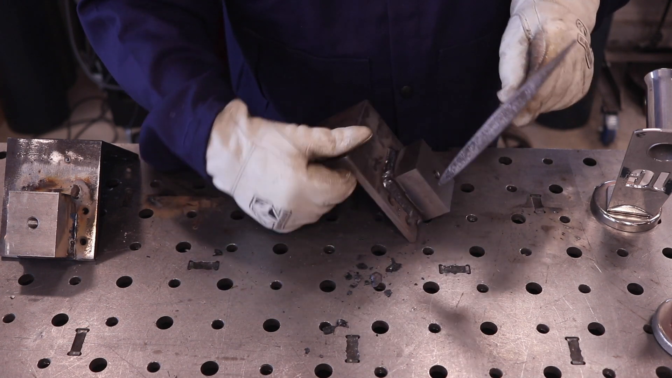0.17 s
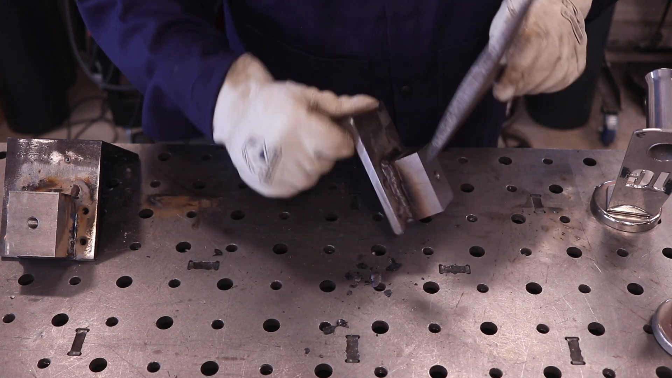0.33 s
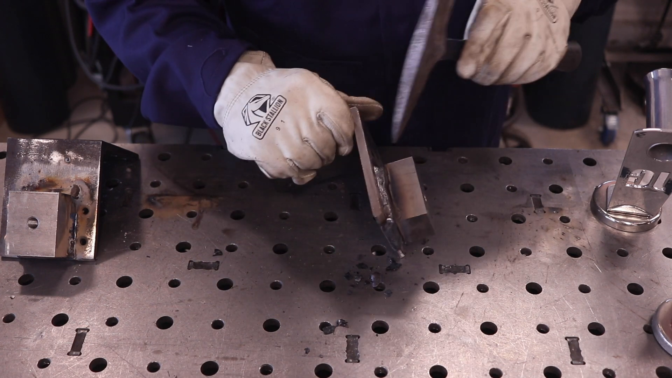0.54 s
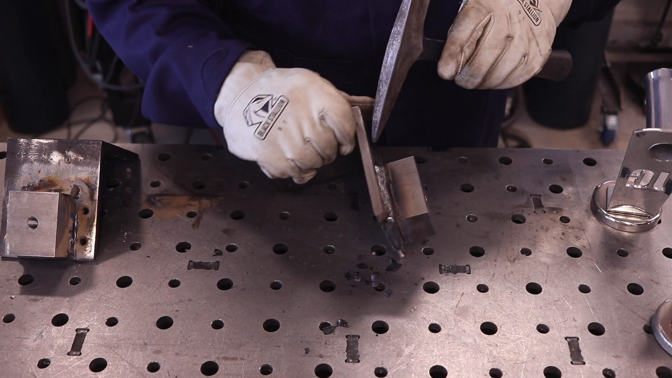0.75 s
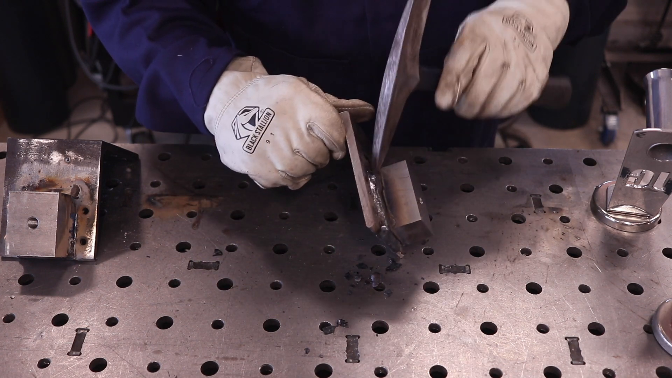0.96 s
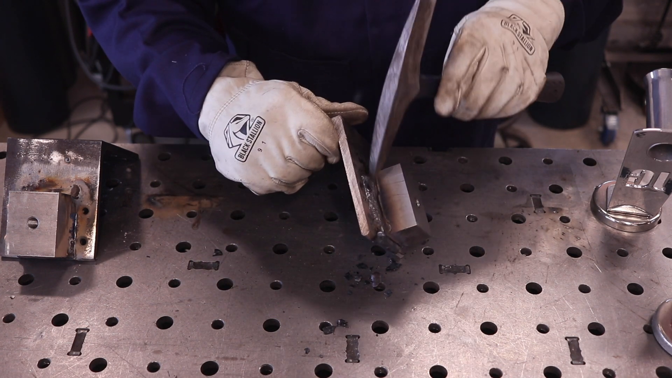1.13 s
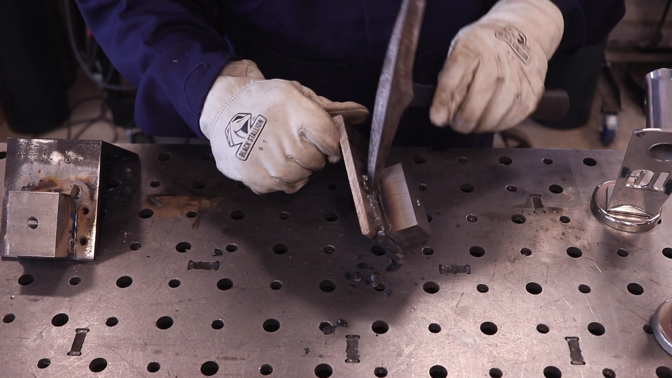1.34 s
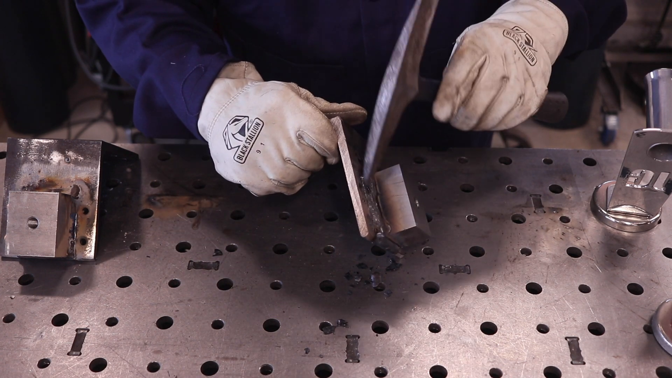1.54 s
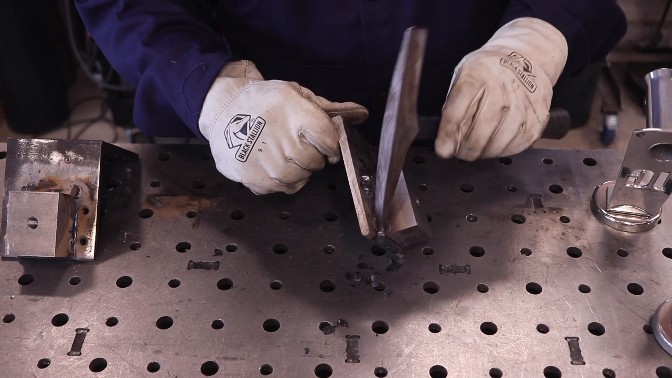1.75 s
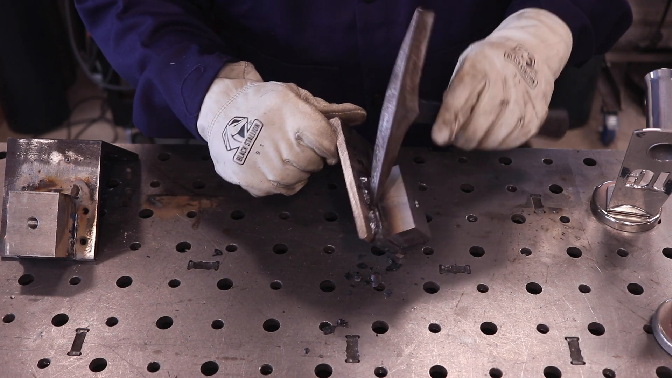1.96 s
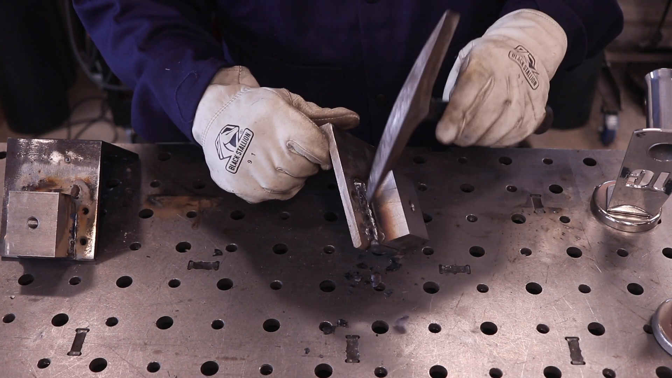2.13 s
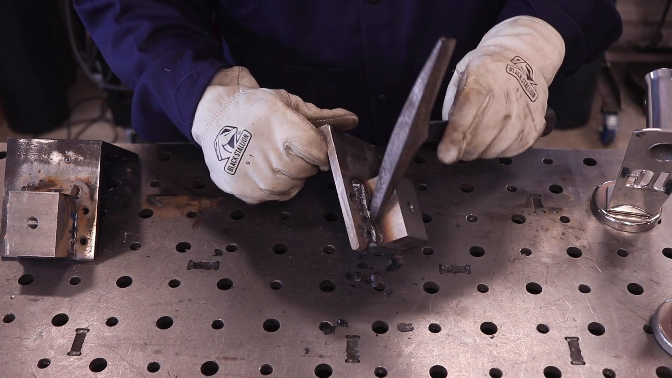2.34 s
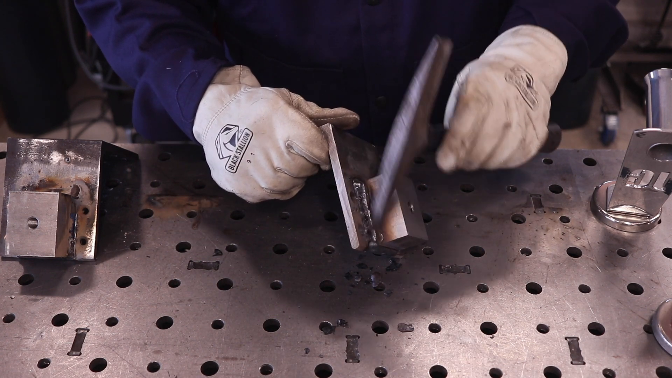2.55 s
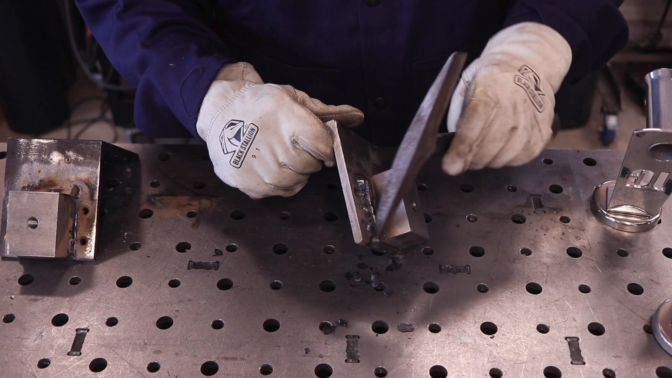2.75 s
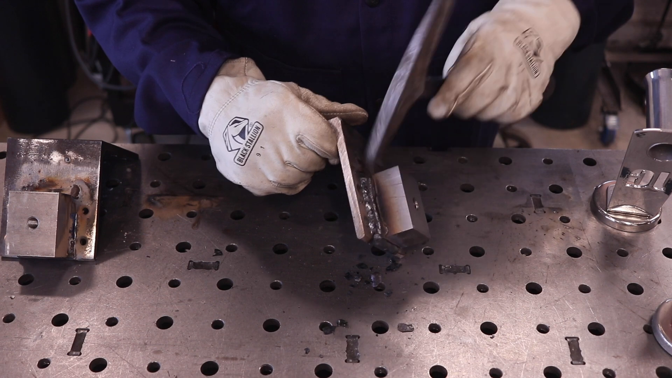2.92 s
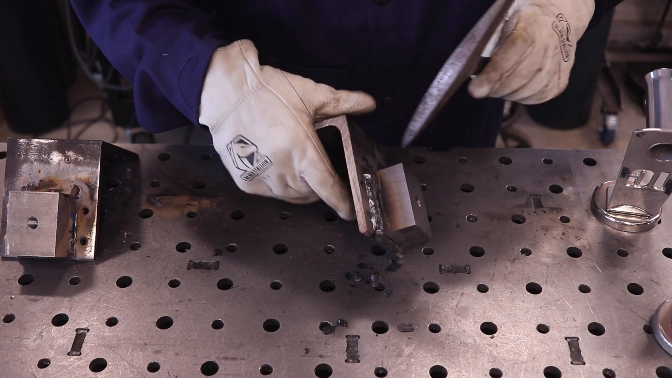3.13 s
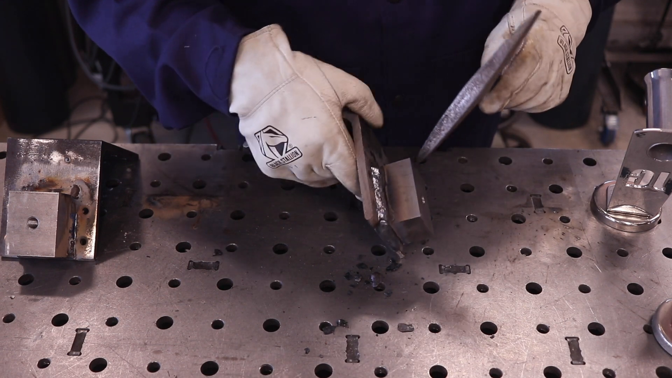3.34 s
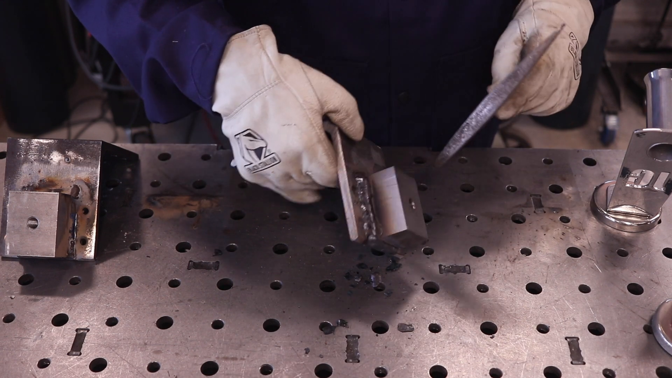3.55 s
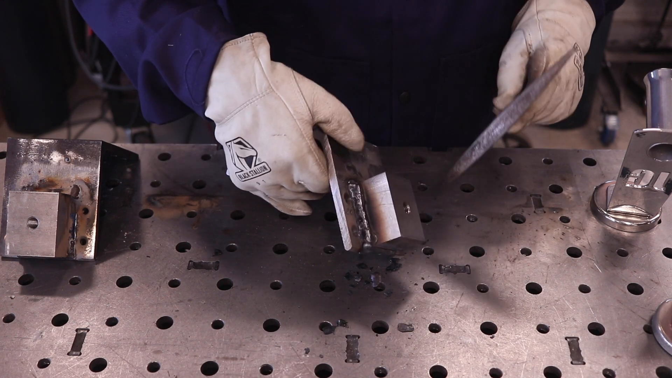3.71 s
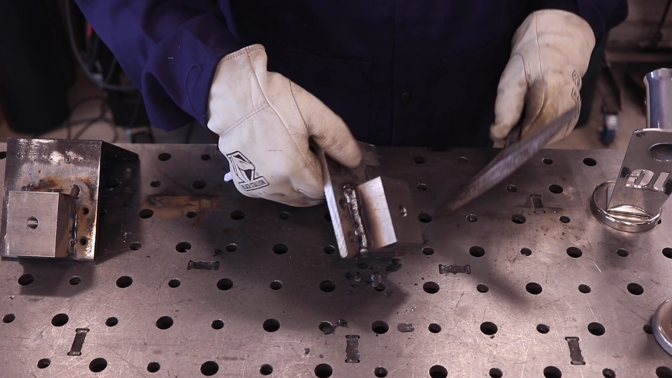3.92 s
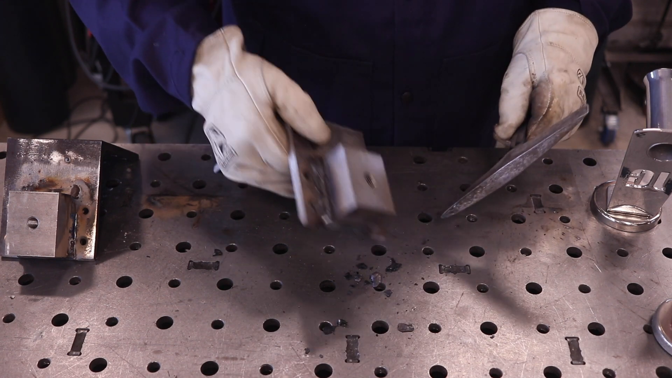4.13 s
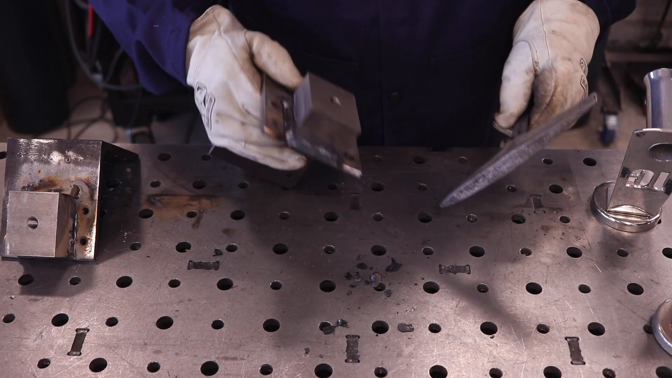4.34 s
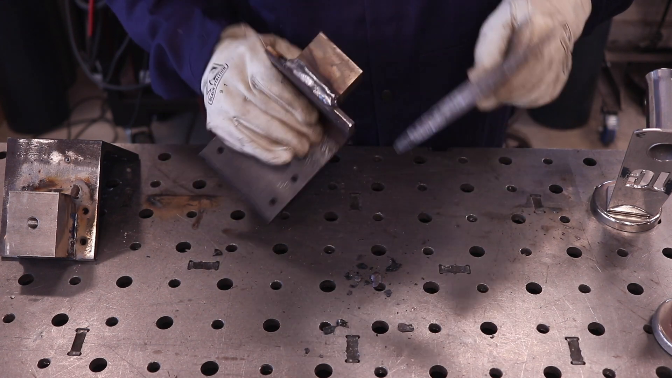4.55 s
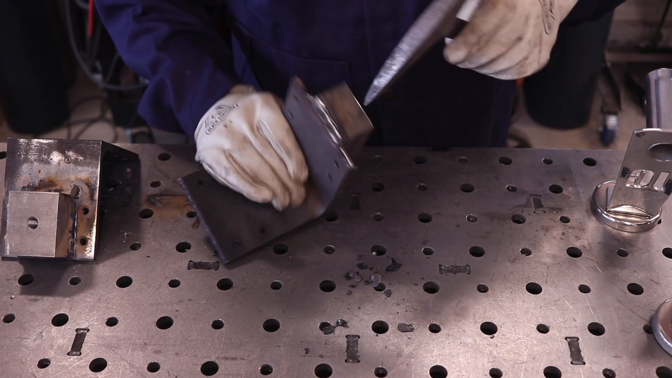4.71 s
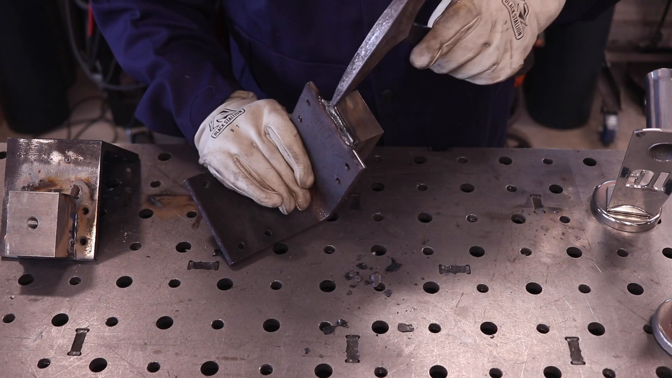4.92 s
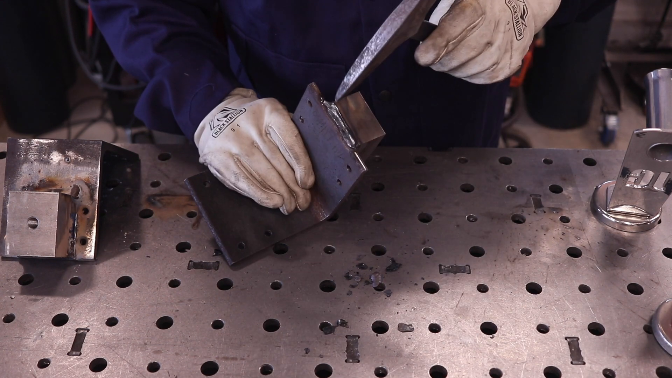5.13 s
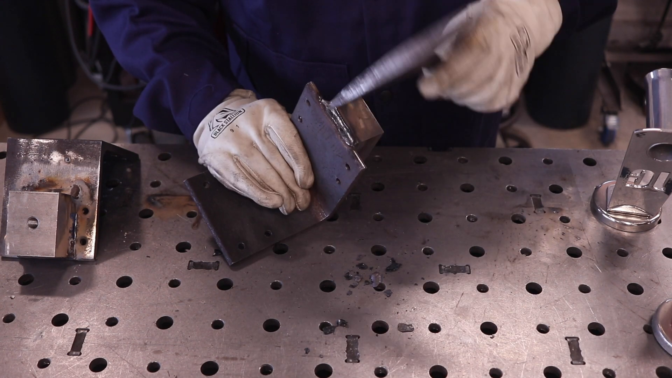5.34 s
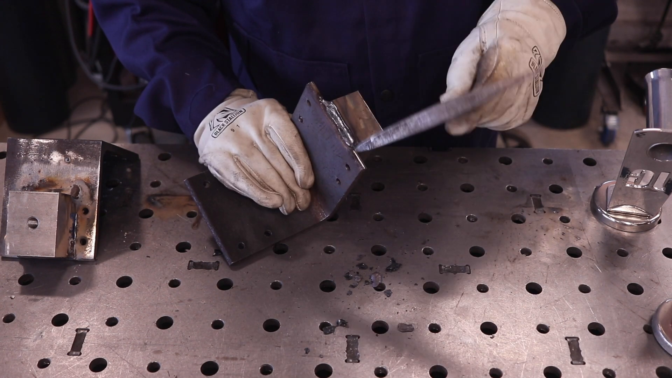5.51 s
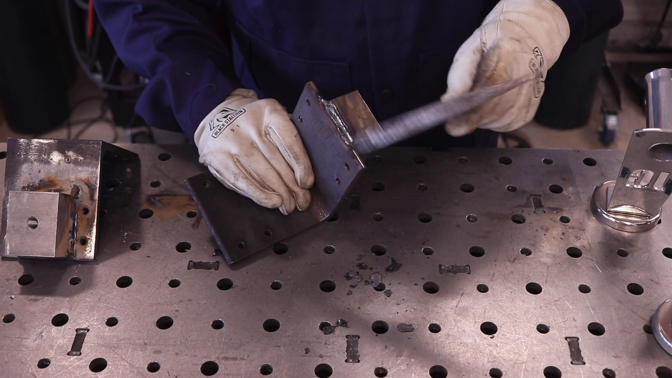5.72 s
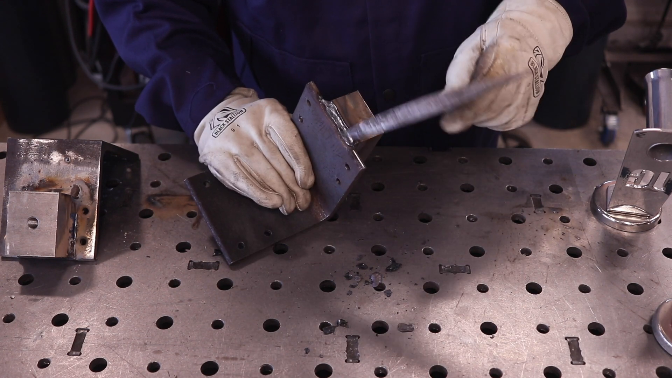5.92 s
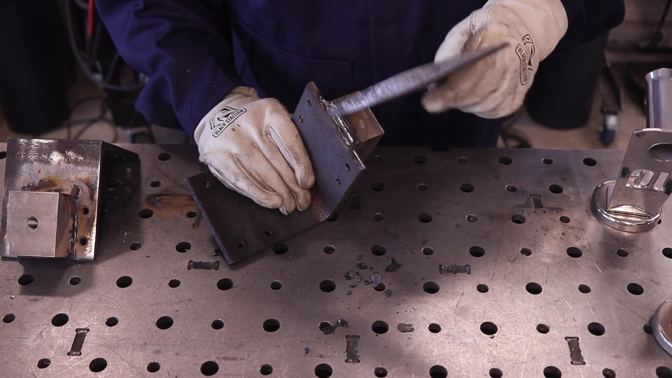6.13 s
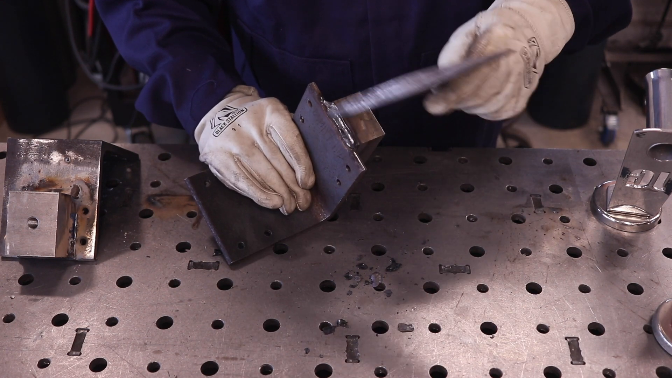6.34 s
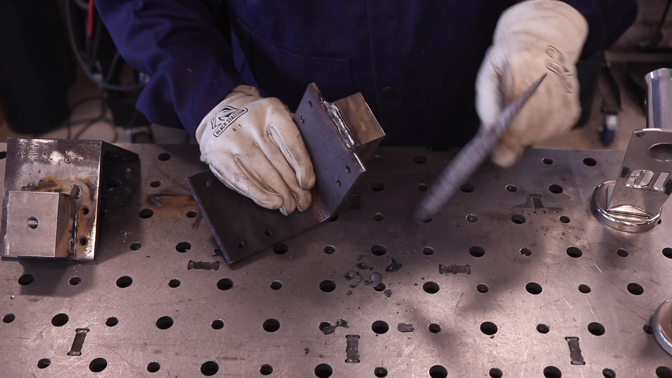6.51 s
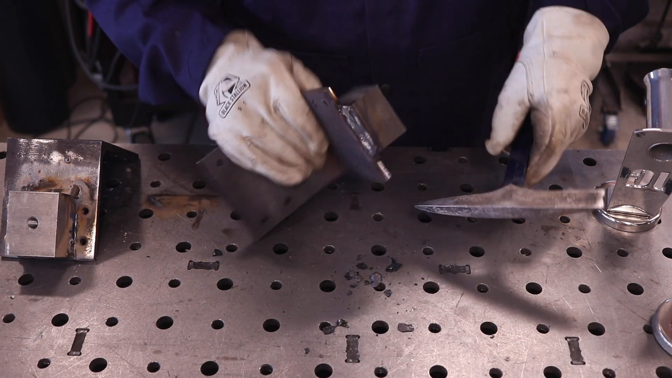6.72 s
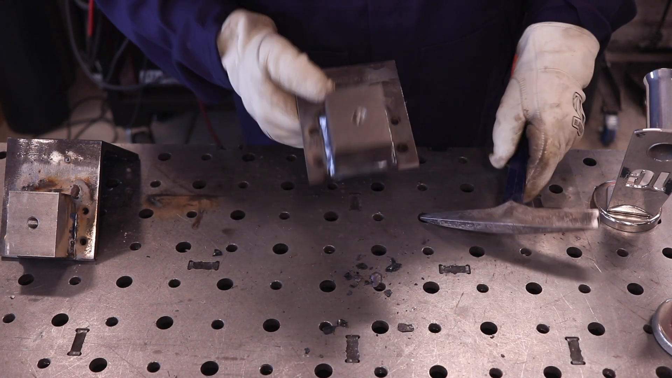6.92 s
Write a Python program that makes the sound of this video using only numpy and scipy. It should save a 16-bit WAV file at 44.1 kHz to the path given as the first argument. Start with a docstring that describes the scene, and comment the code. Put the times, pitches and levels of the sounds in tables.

```python
"""Chipping slag off a welded bracket

A gloved hand chips slag off a welded steel bracket on a thick steel bench in a workshop. Blows and landings are
impulses into damped resonators and decaying noise bands; scrapes and slides feed them with stick-slip grit.
Between blows the hammer head sings as decaying sines. Slag crumbs tick, cloth rustles as shaped hiss, the legs of
the bench boom; a diffuse reverberation and a filtered-noise shop hum lie around it all."""
import sys
import numpy as np
from scipy import signal
from scipy.fft import rfft, irfft, next_fast_len
from scipy.io import wavfile
from scipy.ndimage import uniform_filter1d

SR = 44100
rng = np.random.default_rng(int(sys.argv[2]) if len(sys.argv) > 2 else 0)


def dump(signal):
    """Clip the signal to [-1, 1] and save it as 16-bit WAV at the path in sys.argv[1]."""
    limited = np.clip(np.atleast_2d(signal).T, -1, 1)
    pcm = np.round(limited * 32767).astype(np.int16)
    wavfile.write(sys.argv[1], SR, pcm)


N = 307377
TIME = np.arange(N) / SR


def undb(db):
    """Decibels to gain."""
    return 10 ** (np.asarray(db) / 20)


def band(x, lo_hz, hi_hz):
    """Band-pass."""
    return signal.sosfilt(signal.butter(2, [lo_hz, min(hi_hz, .45 * SR)], "bandpass", fs=SR, output="sos"), x)


def hiss(lo_hz, hi_hz):
    """Band noise of rms 1."""
    x = band(rng.standard_normal(N), lo_hz, hi_hz)
    return x / x.std()


def fade(x, t60):
    """Every impulse becomes an exponential decay, 60 dB down after t60 seconds."""
    return signal.lfilter([1], [1, -1000 ** (-1 / (t60 * SR))], x)


def mode(x, hz, t60):
    """A damped resonator: an impulse of 1 rings with amplitude 1."""
    r = 1000 ** (-1 / (t60 * SR))
    w = 2 * np.pi * hz / SR
    return signal.lfilter([0, np.sin(w)], [1, -2 * r * np.cos(w), r * r], x)


def train(times, sizes):
    """Impulses at the given times."""
    x = np.zeros(N)
    np.add.at(x, (np.asarray(times) * SR).astype(int), sizes)
    return x


def walk(rate):
    """A wandering level: about rate random values per second, joined by ramps."""
    k = int(SR / rate)
    held = np.repeat(rng.standard_normal(N // k + 1), k)
    return uniform_filter1d(held, k)[:N]


def grit(rate, spread_db):
    """Stick-slip: irregular clicks, about rate per second, of very uneven size, rms 1."""
    clicks = rng.random(N) < rate / SR
    x = clicks * undb(spread_db * rng.exponential(size=N)) * rng.standard_normal(N)
    return x / x.std()


def span(start, end):
    """The samples between two times, and their times."""
    part = slice(int(start * SR), int(end * SR))
    return part, TIME[part]


def struck(modes, times, knock_db, rub, scatter_db):
    """Each knock lands elsewhere and wakes the modes unevenly; rubbing feeds them without pause."""
    chance = rng.standard_normal((len(times), len(modes), 2))
    out = 0
    for k, (hz, db, t60) in enumerate(modes):
        sign = np.sign(chance[:, k, 0])
        blows = train(times, sign * undb(knock_db(hz) + scatter_db * chance[:, k, 1]))
        # long-ringing modes are fed less, so that rubbing does not pile up in them
        out = out + undb(db) * mode(blows + rub / np.sqrt(t60 * SR), hz, t60)
    return out


def shop():
    """Distant ventilation and machinery: noise with a fixed spectrum, swelling a little."""
    # spectrum of the shop: f/Hz, relative level/dB per Hz
    spectrum = [(20, -22.5), (40, -15.5), (118, -2.5), (170, -7.5), (290, -5), (700, -11.5), (1500, -15.5),
                (3000, -22.5), (5000, -30), (9000, -40), (16500, -36.5)]
    overall_db, swells_per_s = -51.5, 3.9
    hz, db = np.transpose(spectrum)
    size = next_fast_len(N)
    f = np.maximum(np.arange(size // 2 + 1) * SR / size, 1)
    gain = undb(np.interp(np.log(f), np.log(hz), db))
    x = irfft(rfft(rng.standard_normal(size)) * gain, size)[:N]
    return x / x.std() * undb(overall_db + walk(swells_per_s))


def hammer(times, low_db, high_db, low_rub, high_rub):
    """Touching the weld the head is damped and a little sharper; ringing free, its two lower modes sing on."""
    # bending modes of the head: f/Hz
    head_hz = (3220, 6477, 10900)
    # how broad each mode grows while the point touches steel: width/Hz
    touch_width_hz = (137, 160, 240)
    # the head rings free: ring begins t/s, ring ends t/s, fade-in/s, fade-out/s, low mode rms level/dB,
    # high mode rms level/dB, low mode t60/s
    free_rings = [(0, 0.264, 0.0015, .004, -46, -85, 13), (1.205, 1.423, 0.0034, 0.0018, -43, -40.5, 1.7),
                  (1.52, 1.752, 0.0042, .002, -42.5, -41, 6.1),
                  (1.84, 2.075, 0.0046, .002, -52.5, -42, 3.3), (2.42, 2.608, 0.05, .002, -51, -53, 11),
                  (2.707, 2.89, 0.0081, .002, -42, -40.5, 3.8),
                  (3.036, 3.943, 0.0044, 0.45, -37, -40.5, 2.7), (3.892, 4.208, .1, 0.13, -57, -83, 1.45),
                  (5.543, 5.594, 0.0054, 0.0092, -28.5, -27.5, 0.57),
                  (5.602, 5.768, 0.0048, .002, -30, -35, 0.74),
                  (5.831, 5.996, 0.023, 0.0018, -21, -39, 0.87),
                  (6.08, 6.224, 0.026, 0.0018, -19.5, -37.5, 0.44),
                  (6.302, 6.483, 0.011, 0.0015, -21.5, -18.5, 0.84),
                  (6.58, 6.722, 0.005, 0.034, -19.5, -29.5, 0.68),
                  (6.73, 6.832, 0.032, 0.042, -20, -45, 0.67),
                  (6.902, 7.108, 0.02, 0.0027, -34.5, -66, 9.2)]
    high_ring_t60_s = 0.28
    slip = grit(5000, 2.2)
    blow_levels = (low_db, high_db, high_db - 22.5)
    rubs = (low_rub, high_rub, undb(-10.5) * high_rub)
    out = 0
    for hz, width, blow_db, rub in zip(head_hz, touch_width_hz, blow_levels, rubs):
        t60 = np.log(1000) / (np.pi * width)
        # a blow rings longer than the pressed, rubbing point
        out = out + mode(train(times, undb(blow_db + 1.5)), hz, 4.15 * t60)
        out = out + undb(7) * mode(rub * slip, hz + width / 3, t60) / np.sqrt(t60 * SR)
    for begin, end, fade_in, fade_out, *ring_db, low_t60 in free_rings:
        a, b = int(begin * SR), min(int(end * SR), N)
        t = TIME[a:b] - begin
        gate = np.clip(t / fade_in, 0, 1) * np.clip((end - begin - t) / fade_out, 0, 1)
        for hz, db, t60 in zip(head_hz, ring_db, (low_t60, high_ring_t60_s)):
            sine = np.sqrt(2) * np.sin(2 * np.pi * hz * t)
            out[a:b] += undb(db) * gate * 1000 ** (-t / t60) * sine
    return out


def rustle():
    """Soft swishes of gloves, sleeves and dust: treble hiss that swells and sinks smoothly, roughened."""
    # middle t/s, length/s, relative level/dB
    swish_table = [(0.17, 0.24, -64), (1.556, .03, -52), (1.666, .04, -62), (1.99, .05, -66),
                   (2.06, .04, -75), (2.217, 0.033, -47), (2.286, 0.14, -53), (2.428, .1, -55),
                   (2.54, .04, -60), (2.585, .05, -59), (2.75, 0.073, -74), (2.822, .06, -55),
                   (3.052, 0.037, -53), (3.148, 0.18, -53), (3.28, .06, -62), (3.333, .05, -64),
                   (3.424, 0.13, -56), (3.614, 0.28, -56.5), (3.812, 0.05, -57), (4.03, 0.38, -62.5),
                   (4.21, 0.089, -66), (4.3, .05, -65), (4.68, 0.18, -66), (6.619, .12, -56),
                   (6.715, 0.026, -56)]
    swell = np.zeros(N)
    for middle, length, db in swish_table:
        part, t = span(middle - length / 2, middle + length / 2)
        swell[part] += undb(db) * np.cos(np.pi * (t - middle) / length)
    return swell * undb(-5.0 + 1.6 * walk(49)) * hiss(7300, 13500)


def crumbs():
    """Each slag crumb gives a bright noise tick with a tiny, rough ring: decaying narrow-band noise."""
    # crumbs hitting the bench: t/s, relative level/dB, ring f/Hz
    crumb_table = [(0.0736, -46, 14100), (0.7577, -48, 9600), (1.2057, -36, 10900), (1.3414, -48, 7590),
                   (1.467, -46.5, 8260), (1.4855, -33.5, 10800), (1.4954, -38.5, 11000),
                   (1.5179, -39.5, 11100), (1.5404, -24.5, 11200), (1.5494, -16, 12100),
                   (1.6646, -44.5, 7130), (1.9829, -53.5, 8970), (2.2128, -24, 13400), (2.247, -27, 11600),
                   (2.269, -40, 12800), (2.2768, -31, 12800), (2.304, -36, 12800), (2.3191, -37.5, 12600),
                   (2.343, -28, 10800), (2.3744, -33.5, 12650), (2.4324, -40, 10600), (2.4753, -46, 13300),
                   (2.5306, -41, 12900), (2.5686, -45.5, 13300), (2.6594, -38, 8970),
                   (2.7028, -26.5, 10800), (2.8045, -38, 9920), (3.0385, -27, 11000), (3.2505, -40, 9370),
                   (3.3344, -44, 7690), (5.0145, -43, 7660), (5.0962, -45, 7700), (5.4154, -49, 11600),
                   (5.792, -28, 11100), (6.0564, -43, 7030), (6.5044, -43, 11100), (6.6744, -43.5, 7210)]
    out = np.zeros(N)
    t = TIME[:2000]
    for s, db, hz in crumb_table:
        a = int(s * SR)
        noise, buzz = rng.standard_normal((2, len(t)))
        tick = undb(-4.5) * np.diff(noise, prepend=0) * 1000 ** (-t / 0.0065)
        ring = 2 * undb(-4) * 1000 ** (-t / .035) * band(buzz, hz - 300, hz + 300)
        out[a:a + len(t)] += undb(db) * (tick + ring)
    return out


def slides():
    """Gain tracks for bench, body, edge and grit as the bracket slides and chatters: dB ramps with one turn."""
    # start t/s, turning point t/s, end t/s (a row that ends before it starts is silent),
    # relative level/dB at the turning point of bench shaking, body, edge and grit,
    # start and end levels in dB below the turning point (negative: above it)
    slide_table = [(0.183, 0.256, 0.32, -26, -68, -66, -54, 5.5, -2),
                   (0.3, 0.308, 0.57, -5.5, -51, -48, -56, 1, 26.5),
                   (0.442, 0.468, 0.57, -24.5, -58, -42, -58, 9, 27),
                   (4.289, 4.37, 4.39, -26.5, -50.5, -60, -66, 24, 1),
                   (4.46, 4.494, 4.72, -30.5, -64, -67, -80, 18, 32),
                   (4.864, 4.866, 5.12, -7, -50, -58, -37, 0, 24),
                   (6.551, 6.55, 6.68, -12, -40, -55, -38, 3, 41),
                   (6.705, 6.725, 6.8, -17, -41, -58.5, -40, 12.5, 3.5),
                   (6.796, 6.905, 6.92, -14.5, -32, -45, -36, 6.5, 11),
                   (6.915, 6.913, 6.85, -33.5, -33, -47, -58, 2, 16)]
    out = np.zeros((4, N))
    for start, turn, end, *levels_db, start_below_db, end_below_db in slide_table:
        part, t = span(start, end)
        below_db = np.interp(t, [start, turn, end], [start_below_db, 0, end_below_db])
        out[:, part] += undb(np.array(levels_db)[:, None] - below_db)
    return uniform_filter1d(out, size=200, axis=1)


def bench(times, mid_db, low_db, high_db, shake, tok_db):
    """Crowded plate modes and the clatter of countless faint ones: a quick knock, then a tail."""
    # plate modes: f/Hz
    plate_hz = (313, 350, 432, 450, 483, 531, 576, 630, 666, 800, 832, 890, 948, 968, 994, 1015, 1060, 1099,
                1135, 1178, 1263, 1302, 1370, 1466, 1520, 1658, 1815)
    # plate modes: relative level/dB
    plate_level_db = (-23, -18.5, -7, -2.5, 0.5, -6, -3.5, -13.5, -21, -5, -7.5, 0, 2, 1, 0.5, -1.5, 1,
                      -7.5, -3.5, 1.5, -14, -3, -3, -30.5, -10.5, -31, -12.5)
    # the heavy frame damps the plate: t60/s up to 700 Hz, t60/s above
    plate_t60_s = (.35, .2)
    tok_hz, tok_octaves = 945, 0.14  # a flat landing favours the modes near this pitch
    shake = shake * grit(3000, 2.5)
    modes = [(hz, db, plate_t60_s[hz > 700]) for hz, db in zip(plate_hz, plate_level_db)]

    def knock_db(hz):
        """Level of each knock at one mode: a positive tok lifts modes near its pitch and lowers those far off."""
        if hz < 700:
            return low_db - 17
        nearness = np.exp(-(np.log2(hz / tok_hz) / tok_octaves) ** 2)
        return mid_db - 22.0 + tok_db * (2 * nearness - 1)

    ring = struck(modes, times, knock_db, undb(-17.5) * shake, 2.84)
    # knock level/dB, knock t60/s, tail level/dB against the knock, tail t60/s, band edges f/Hz
    clatter_bands = [(low_db - 11.5, .05, -6, .3, 250, 700),
                     (mid_db - tok_db - 13.0, .025, -9, .25, 700, 1500),
                     (high_db - 2.5, .02, -9, .2, 1500, 2900),
                     (high_db - 26.0, .02, -8, .15, 2800, 6000)]
    clatter = 0
    for db, t60, tail_db, tail_t60, lo, hi in clatter_bands:
        blows = train(times, undb(db))
        decay = fade(blows, t60) + undb(tail_db) * fade(blows, tail_t60)
        clatter = clatter + decay * hiss(lo, hi)
    return ring + clatter + undb(-4.0) * band(shake, 703, 1780)


def bracket(times, clank_db, body_db, edge_db, body_slide, edge_slide):
    """The upright flange clanks: low body modes and bright edge modes both ring under knocks and slides."""
    # body modes: f/Hz
    body_hz = (900, 1270, 1960, 2400, 3052, 4190, 4575)
    # body modes: relative level/dB, t60/s
    body_rows = [(-18, 0.13), (-1, 0.037), (2.5, 0.038), (-12.5, 0.038), (2.5, 0.11), (-1, 0.052),
                 (-7, 0.088)]
    # edge modes: f/Hz
    rim_hz = (6745, 7650, 7900, 8900, 9300, 9615, 10030, 10840, 11600, 12340, 12770, 13520, 14200, 15410)
    # edge modes: relative level/dB, t60/s before the glove's limit
    rim_rows = [(-7.5, .15), (4, .1), (-11, .04), (2.5, 0.12), (-3, .12), (-0.5, 0.11), (-7, 0.054),
                (7, 0.085), (1, 0.033), (2, 0.15), (-2, .1), (-1.5, .1), (-7, .1), (-5, .06)]
    rim_longest_s, scatter_db = .13, 2.5  # the glove damps the rim
    slip = grit(2500, 2.2)
    body = [(hz, *row) for hz, row in zip(body_hz, body_rows)]
    edge = [(hz, db, min(t60, rim_longest_s)) for hz, (db, t60) in zip(rim_hz, rim_rows)]

    def body_knock_db(hz):
        """The lower body modes carry the clank."""
        return clank_db + 3 if hz < 2800 else body_db - 0.5

    def edge_knock_db(hz):
        """All edge modes are knocked alike, before the scatter."""
        return edge_db - 11.5

    body_ring = struck(body, times, body_knock_db, undb(10.5) * body_slide * slip, scatter_db)
    edge_ring = struck(edge, times, edge_knock_db, undb(4.0) * edge_slide * slip, scatter_db)
    return body_ring + edge_ring


def cracks(times, crack_db):
    """The sharp treble of each contact: a noise burst with a quick decay and a faint slower one."""
    quick = fade(train(times, undb(crack_db)), 0.01)
    slow = fade(train(times, undb(crack_db - 27.0)), 0.022)
    return (quick + slow) * hiss(2740, 13000)


def booms(times, low_db, land_s, boom_db):
    """The legs of the bench boom as decaying bass noise, most when the bracket lands."""
    leg_db = -39.5  # every knock also jolts the legs a little
    jolts = train(land_s, undb(boom_db)) + train(times, undb(low_db + leg_db))
    return fade(jolts, 0.6) * hiss(45, 164)


def scrapes():
    """Gain tracks for grit, both hammer modes and the bench: a skid, an uneven drag, a flick, a release."""
    # the point drags along the weld, then flicks off: touch t/s, flick t/s, flick width/s,
    # relative level/dB of bench shaking, grit and hammer, then flick boost/dB
    scrape_table = [(1.106, 1.19, .01, -28, -58, -58, 6), (1.433, 1.499, 0.011, -31, -61, -49.5, 17),
                    (1.793, 1.832, .02, -12.5, -43, -46, 7), (2.095, 2.151, 0.037, -17, -52, -46, 6),
                    (2.343, 2.428, 0.017, -32, -60, -48, 13.5), (2.634, 2.703, 0.017, -13, -57, -39, 10),
                    (2.903, 2.99, 0.039, -21, -51, -34, 9), (5.418, 5.53, 0.026, -20, -61, -37.5, 23.5),
                    (5.779, 5.82, 0.016, -25, -49, -30.5, 4.5), (6, 6.065, 0.016, -31, -58, -39, 12),
                    (6.243, 6.313, 0.044, -17, -43.5, -38, 20), (6.498, 6.558, 0.026, -39, -54, -36, 23)]
    skid_db, skid_s, judder_db = 9.5, .01, 2  # first skid after a blow; unevenness
    flick_share, high_rub_db = 0.33, -2  # share of skid and flick dB reaching the bench; high mode against low
    tire_db_per_s, release_db_per_s, linger_s = 38.5, 499.5, .1  # the drag weakens; after the flick it lets go
    out = np.zeros((4, N))
    judder = judder_db * walk(60)
    for touch, flick, width, bench_db, grit_db, head_db, flick_db in scrape_table:
        part, t = span(touch, flick + linger_s)
        skid = skid_db * np.exp(-(t - touch) / skid_s)
        peak_db = skid + flick_db * np.exp(-((t - flick) / width) ** 2)
        release_db = release_db_per_s * np.maximum(t - flick - width, 0)
        drag_db = judder[part] - tire_db_per_s * (t - touch) - release_db
        tracks_db = np.array([grit_db + peak_db,
                              head_db + peak_db,
                              head_db + high_rub_db + peak_db,
                              bench_db + flick_share * peak_db])
        out[:, part] = undb(tracks_db + drag_db)
    return uniform_filter1d(out, size=200, axis=1)


def crunch(scrape, slide):
    """Grit crunches under the hammer point and under the bracket: band-passed stick-slip clicks."""
    under_point = undb(-11.0) * scrape * band(grit(8000, 1.8), 2800, 13000)
    under_bracket = undb(-5.0) * slide * band(grit(6700, 1.8), 2000, 8400)
    return under_point + under_bracket


def room(x):
    """A diffuse tail of half-octave noise bands that dies faster in the treble."""
    # reverberation: f/Hz, relative level/dB, t60/s
    reverb_table = [(147, -0.5, 1), (404, -1.5, 0.82), (890, -1, 0.45), (2430, -7.5, 0.56),
                    (4500, -8, 0.58), (9200, -16, 0.19), (16000, -23, 0.18)]
    hz, db, t60 = np.transpose(reverb_table)
    t, tail = TIME[:SR], 0
    for f in 170 * 2 ** np.arange(0, 6.6, .5):
        decay = np.interp(np.log(f), np.log(hz), t60)
        gain = undb(np.interp(np.log(f), np.log(hz), db)) / np.sqrt(decay * SR / 14)
        shape = 1000 ** (-t / decay) * np.clip(t / 0.0256, 0, 1)  # builds up over 25.6 ms
        tail = tail + gain * shape * band(rng.standard_normal(SR), f / 1.161, f * 1.123)
    return signal.fftconvolve(x, tail)[:N]


def scene():
    """All sources, their reverberation and the shop."""
    # the hammer strikes, rebounds or catches on the weld: t/s, then relative level/dB of
    # bench, flange clank, crack, hammer low mode, hammer high mode
    blow_table = [(1.08, -8, -23.5, -18.5, -14.5, -19.5), (1.416, -5, -24.5, -49, -16, -27),
                  (1.454, -13.5, -48, -42.5, -44, -50), (1.745, -4.5, -23, -36, -9, -12),
                  (1.764, -10, -28, -23.5, -41, -28), (1.775, -13, -31, -30, -17.5, -30),
                  (2.073, -1, -21, -12.5, -13, -22.5), (2.08, -16, -21, -30, -13, -35),
                  (2.351, -6.5, -44, -19.5, -22, -27), (2.359, -19.5, -25, -46, -38, -49),
                  (2.598, -9, -25, -47, -38, -29.5), (2.616, -6, -18, -19.5, -19, -25),
                  (2.702, -18.5, -43, -51, -52, -41), (2.896, -6.5, -17, -11, -9, -24),
                  (2.915, -24, -45, -54.5, -55, -43), (3.0, -22, -33, -42, -19, -51),
                  (3.292, -14.5, -33, -38, -53, -58), (3.301, -14.5, -35, -50, -60, -58),
                  (5.401, -3, -11, -22, -24, -25), (5.529, -16, -31, -26, -41, -19.5),
                  (5.54, -14, -32, -15.5, -16.5, -18), (5.599, -19.5, -27.5, -44, -33, -32),
                  (5.76, -11.5, -14, -50, -21, -8), (5.771, -11, -26, -28, -20, -29),
                  (5.995, -12, -16, -22, -19.5, -18.5), (6.012, -21.5, -27, -41, -19.5, -17),
                  (6.08, -16.5, -42, -60, -23, -33), (6.233, -14, -18, -55, -31, -39),
                  (6.249, -15, -46, -41, -45, -37), (6.484, -14, -19, -40, -48, -34),
                  (6.521, -25, -34, -34, -41, -23), (6.538, -6.5, -42, -13, -19, -13.5),
                  (6.579, -8.5, -40, -25, -26, -20)]
    # the bracket lands, rocks or ticks on the bench: t/s, then relative level/dB of
    # bench middle, bench low, bench high, body, edge, tok
    landing_table = [(0.269, -11, -21, -19.5, -43, -38, 6), (0.279, 4.5, -16, -12.5, -40, -21, 0.5),
                     (0.389, -8.5, -25, -33, -53, -53, 2), (0.436, -21, -35, -32, -54, -45, 0),
                     (0.459, -35, -39, -36, -51, -39, 0), (0.491, -36, -40, -36, -50, -33.5, 0),
                     (0.588, -22, -16.5, -34.5, -56, -40, -3), (0.622, -0.5, -16.5, -18.5, -32, -64, 6.5),
                     (3.803, -42, -70, -59, -58, -59, 3), (4.008, -51, -64, -66, -56, -63, 0),
                     (4.092, -47, -58, -62, -61, -65, 0), (4.44, -44, -33, -41, -38.5, -42.5, 0),
                     (4.466, -44, -50, -49, -51, -64, -1), (4.494, -47, -40, -45, -44, -62, -1),
                     (4.507, -30, -43, -47, -44, -56, 3), (4.771, 1, -9, -13.5, -23, -34, 1.5),
                     (4.815, -10, -19, -12, -16, -32.5, 0), (4.84, 0, -24, -10, -13.5, -29, 0.5),
                     (4.857, -7.5, -16, -18, -23, -27.5, -2), (4.876, -20, -15.5, -18, -27, -54, 0),
                     (4.894, -26, -9, -37, -48, -47, -4), (4.934, -16, -22, -24, -38, -43, 2),
                     (6.811, -23, -35, -19.5, -50, -54, 2), (6.858, -25, -36, -27, -50, -46, -3)]
    blow_s, blow_db, flange_db, snap_db, ring_db, overtone_db = np.transpose(blow_table)
    land_s, land_db, thump_db, treble_db, plate_db, rim_db, land_tok_db = np.transpose(landing_table)

    # every contact, blows first, then landings
    times = np.r_[blow_s, land_s]
    mid_db = np.r_[blow_db, land_db]
    # the low thump changes less from blow to blow than the rest
    low_db = np.r_[0.69 * blow_db - 10, thump_db]
    # the bench's treble goes with the flange clank
    high_db = np.r_[flange_db - 4, treble_db]
    clank_db = np.r_[flange_db, treble_db - 5.5]
    crack_db = np.r_[snap_db, treble_db - 25]
    body_db = np.r_[blow_db - 27, plate_db]
    # under a blow the edge goes with both bench level and crack
    edge_db = np.r_[(blow_db + snap_db) / 2 - 23, rim_db]
    tok_db = np.r_[0 * blow_s, land_tok_db]

    scrape, low_rub, high_rub, push = scrapes()
    shake, body_slide, edge_slide, slide = slides()
    dry = hammer(blow_s, ring_db, overtone_db, low_rub, high_rub)
    dry = dry + rustle() + crumbs()
    dry = dry + bench(times, mid_db, low_db, high_db, shake + undb(-5.5) * push, tok_db)
    dry = dry + bracket(times, clank_db, body_db, edge_db, body_slide, edge_slide)
    dry = dry + cracks(times, crack_db) + crunch(scrape, slide)
    # rumble below 210 Hz is cut from the knocks, rings and scrapes
    dry = signal.sosfilt(signal.butter(3, 210, "highpass", fs=SR, output="sos"), dry)
    leg_boom = booms(times, low_db, land_s, thump_db - 30)
    return (dry + room(dry) + leg_boom + shop())[None]


def record(dry):
    """The loudest peaks are rounded; the microphone droops at both ends, then a steep treble cut."""
    rounded = dry / (1 + (dry / .97) ** 6) ** (1 / 6)
    soft = signal.sosfilt(signal.butter(1, 45, "highpass", fs=SR, output="sos"), rounded)
    soft = signal.sosfilt(signal.butter(4, 14300, fs=SR, output="sos"), soft)
    return signal.sosfilt(signal.ellip(10, .2, 80, 16550, fs=SR, output="sos"), soft)


dry = scene()
out = record(dry)
dump(out)
```